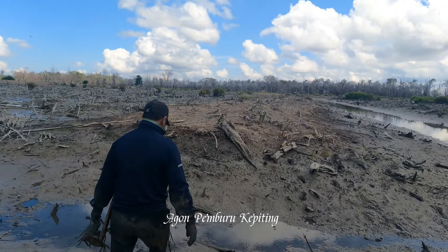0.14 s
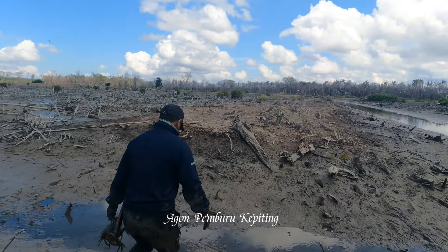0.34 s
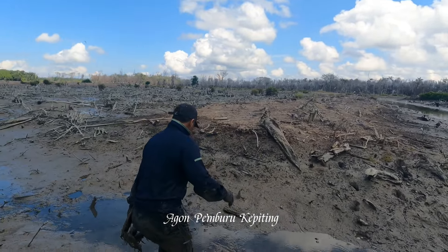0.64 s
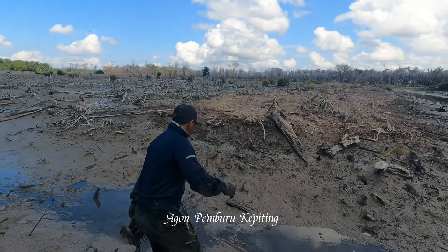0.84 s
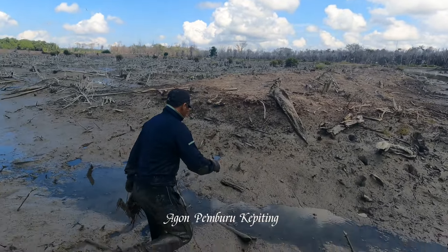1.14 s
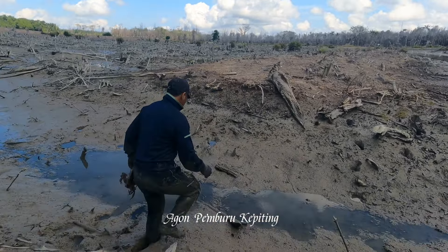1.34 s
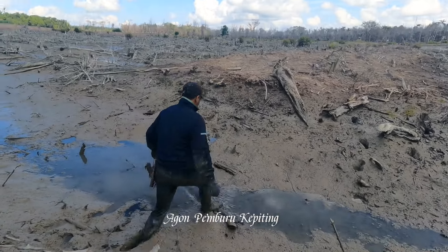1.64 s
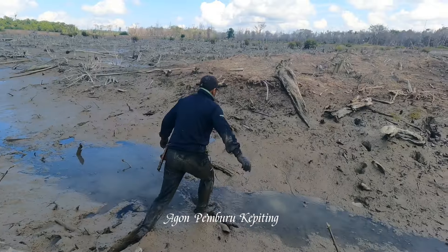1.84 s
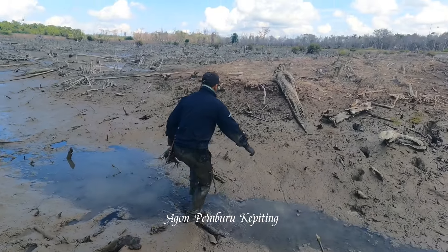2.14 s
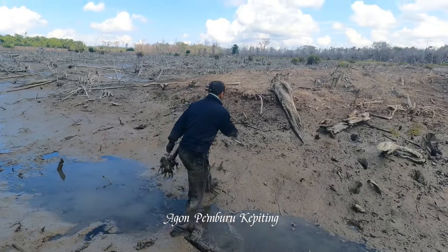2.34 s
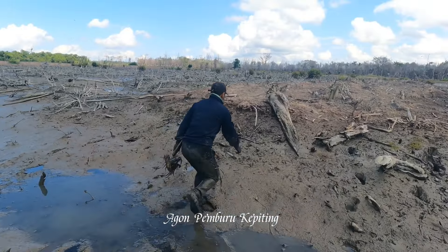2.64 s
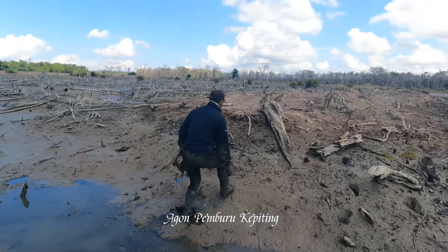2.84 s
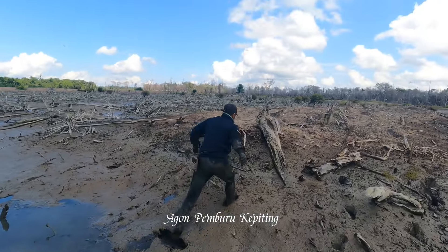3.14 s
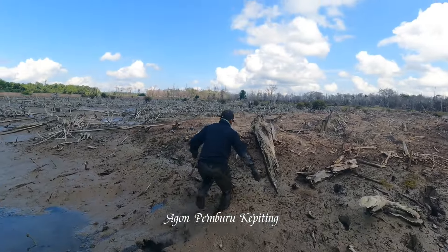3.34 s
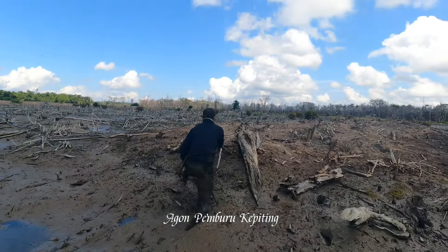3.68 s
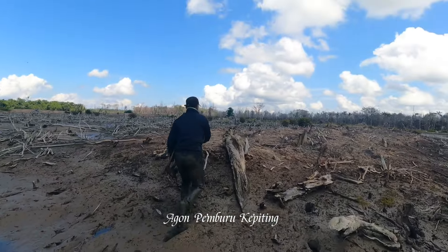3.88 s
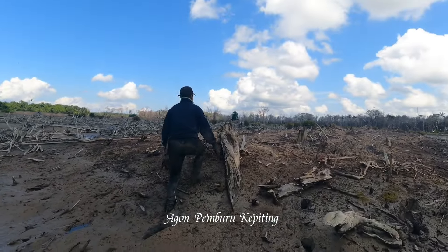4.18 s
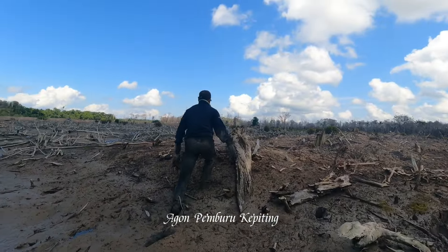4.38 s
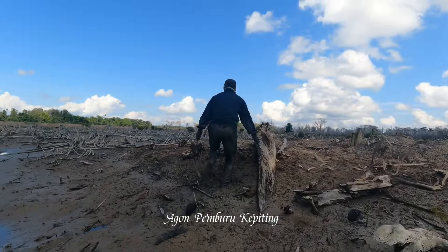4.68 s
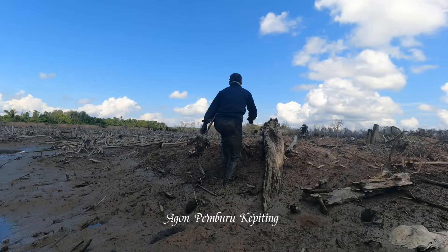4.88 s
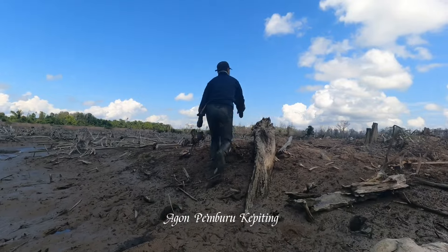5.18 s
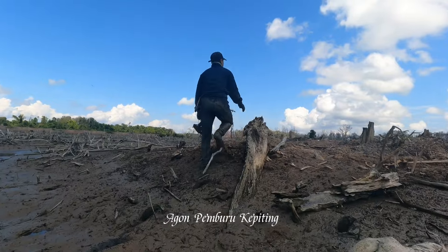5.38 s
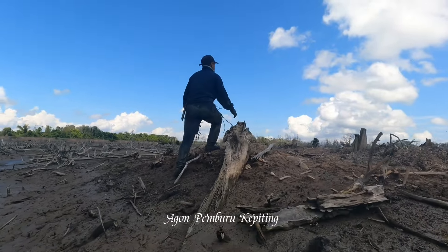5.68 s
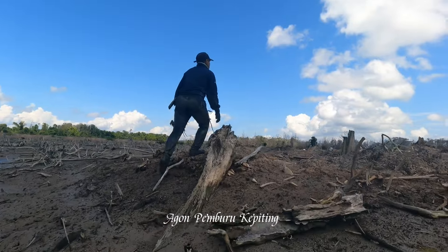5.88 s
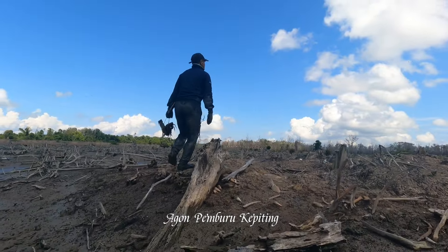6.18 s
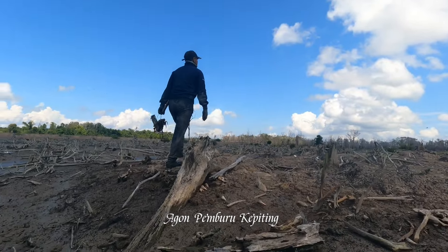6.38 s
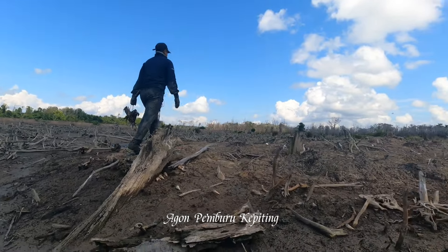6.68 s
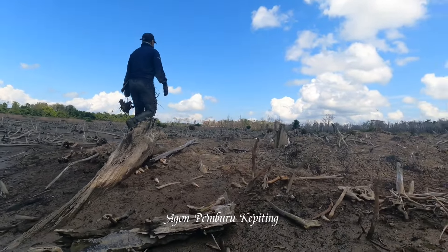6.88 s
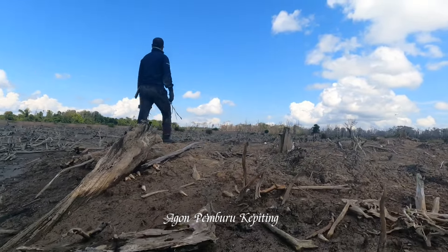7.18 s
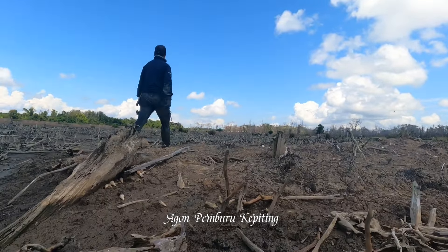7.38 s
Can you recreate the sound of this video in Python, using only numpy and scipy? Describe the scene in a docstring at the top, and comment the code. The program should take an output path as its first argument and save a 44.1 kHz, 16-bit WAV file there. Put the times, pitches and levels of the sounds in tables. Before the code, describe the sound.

Boots squelch through deep wet mud with sticky pops, gulps and bubble plinks, while low wind rumbles and dull thuds knock the microphone.

```python
"""Boots tramp through deep wet mud and up a bank of dead sticks, close to a hand-held camera.
It opens with wind rumble, dull thuds on the camera and a few pops from softly seeping mud.
Then bubbles plink, boots squelch, and from about 2 s air pockets gulp and water squirts out.
Pops and gulps grow strong from 3 to 6 s, thin out, and come back with two thuds near the end.
Mud is many tiny damped tones plus noise; pops are ringing pockets; gulps glide; wind is shaped noise."""
import sys
import numpy as np
from scipy import signal
from scipy.fft import rfft, irfft, next_fast_len
from scipy.io import wavfile
from scipy.ndimage import uniform_filter1d, map_coordinates

SR = 44100
rng = np.random.default_rng(int(sys.argv[2]) if len(sys.argv) > 2 else 0)


def waveform_to_disk(signal):
    """Save audio, clipped to [-1, 1], as 16-bit WAV at the path in sys.argv[1]."""
    frames = np.transpose(np.atleast_2d(signal))
    scaled = np.clip(frames, -1, 1) * 32767
    samples = np.round(scaled).astype(np.int16)
    wavfile.write(sys.argv[1], SR, samples)


N = 331701
TIME = np.arange(N) / SR


def amp(db):
    """Turn decibels into gain."""
    return 10 ** (np.asarray(db) / 20)


def unit(x):
    """Scale to an average strength (rms) of 1."""
    return x / np.sqrt(np.mean(x ** 2) + 1e-20)


def along(points, hz):
    """Read a table of (frequency, value) points on a log frequency axis."""
    point_hz, value = np.transpose(points)
    return np.interp(np.log(hz + 1), np.log(point_hz + 1), value)


def curves(rows):
    """Join the table rows with straight lines: one curve for each column after the time."""
    time_s, *columns = np.transpose(rows)
    return [np.interp(TIME, time_s, column) for column in columns]


def wobble(knots_per_s):
    """A smooth random curve through random knots."""
    knots = rng.standard_normal(int(N * knots_per_s / SR) + 4)
    return map_coordinates(knots, [TIME * knots_per_s])


def filtered(x, response):
    """Change the strength and phase of each frequency by a given response."""
    size = next_fast_len(N + 8192)
    hz = np.fft.rfftfreq(size, 1 / SR)
    return irfft(rfft(x, size) * response(hz), size)[..., :N]


def coloured(x, spectrum, size=8192):
    """Shape the tone with a filter of unit energy that never sounds ahead of its input."""
    level = amp(along(spectrum, np.fft.rfftfreq(size, 1 / SR)))
    cepstrum = irfft(np.log(level))
    # folding the cepstrum forward in time makes the filter causal
    fold = 1 + np.sign(size / 2 - np.arange(size))
    fold[0] = 1
    kernel = irfft(np.exp(rfft(cepstrum * fold)))
    return signal.oaconvolve(x, kernel / np.linalg.norm(kernel))[:len(x)]


def resonance(x, hz, q):
    """A damped hollow rings near one pitch; a higher q rings longer."""
    b, a = signal.iirpeak(min(hz, SR / 4), max(q, 1), SR)
    return signal.lfilter(b, a, x)


def add(track, start_s, sound):
    """Mix a sound into a track at its start time."""
    start = max(round(start_s * SR), 0)
    part = track[start:start + len(sound)]
    part += sound[:len(part)]


def steadied(x, seconds):
    """Even out slow swells, leaving an rms near 1 throughout."""
    power = uniform_filter1d(x * x, int(seconds * SR) + 1)
    return x / np.sqrt(np.abs(power) + 1e-9)


def swells(rows, attack_s, release_s):
    """Power of each level column: every event rises, holds and dies away; overlaps add."""
    power = np.zeros((len(rows[0]) - 2, N))
    t = np.arange(SR * 3 // 4) / SR
    for start_s, length_s, *levels_db in rows:
        rise = np.minimum(t / attack_s, 1)
        shape = rise * np.exp(-np.maximum(t - length_s, 0) / release_s)
        for track, level_db in zip(power, levels_db):
            add(track, start_s, (amp(level_db) * shape) ** 2)
    return power


def ringing(rows, attack_s, rough):
    """Damped gliding tones, each swelling quickly as its cavity opens."""
    track = np.zeros(N)
    t = np.arange(SR // 4) / SR
    for start_s, level_db, pitch_hz, t60_s, rise_octaves in rows:
        flex = unit(uniform_filter1d(rng.standard_normal(len(t)), size=100))  # soft walls waver
        glide = 2 ** (rise_octaves * np.minimum(t / t60_s, 1))
        pitch = pitch_hz * glide * (1 + rough * flex)
        fade = np.exp(-np.log(1000) * t / t60_s)  # 60 dB down after t60_s
        swell = 1 - np.exp(-t / attack_s)
        tone = np.sin(2 * np.pi * np.cumsum(pitch) / SR)
        add(track, start_s, amp(level_db) * fade * swell * tone)
    return track


# tone of the faint open air: frequency_hz, level_db (relative)
AIR = [(120, -20.5), (220, 1.5), (400, -10.5), (750, -14), (1250, -6), (2500, -17.5), (7000, -27),
       (10000, -31), (12300, -29), (16000, -41)]


def open_air():
    """The faint open air is steady noise with a fixed tone."""
    return amp(-46.5) * unit(coloured(rng.standard_normal(N), AIR))


# the breeze between gusts: time_s, rumble_db, flutter_db
BREEZE = [(0, -29, -39), (.45, -30, -42), (1.2, -25.5, -40.5), (1.65, -27.5, -42.5), (2.85, -23.5, -41),
          (3.3, -27.5, -44.5), (4.2, -24, -41), (4.6, -31.5, -49), (5.3, -27, -44), (6.2, -29, -46),
          (6.85, -27.5, -47.5), (7.52, -27.5, -44)]
# gusts on top of the breeze: start_s, length_s (before the fade), rumble_db, flutter_db
GUSTS = [(0, .19, -23, -25), (.77, 0.27, -22, -40), (1.47, 0.057, -13, -33), (1.73, 0.2, -21, -36),
         (1.95, 0.11, -19, -27.5), (2.22, 0.094, -17, -42), (2.43, 0.2, -19, -31),
         (2.99, 0.17, -24.5, -32.5), (3.66, 0.068, -20.5, -31), (3.87, 0.048, -26, -35),
         (4.1, 0.13, -20, -40), (5.05, 0.14, -27.5, -36), (5.84, 0.052, -29, -36), (6.65, .14, -23, -52),
         (6.98, .05, -25, -35), (7.21, .15, -20.5, -26.5)]
# tone of the deep wind rumble: frequency_hz, level_db (relative)
RUMBLE = [(8, -9.5), (20, 3), (38, 3), (60, -4.5), (95, -14), (160, -30.5), (400, -92)]
# tone of the higher wind flutter: frequency_hz, level_db (relative)
FLUTTER = [(50, -19.5), (95, 1), (175, -1.5), (250, -8.5), (400, -21), (900, -56)]


def eddies(spectrum, apart, left_db, gust_db, seconds):
    """Swirling air presses on both microphone ports together and oppositely on each one."""
    def swirl():
        return steadied(coloured(rng.standard_normal(N), spectrum), seconds)
    shared = swirl()
    own = swirl() * apart * amp(gust_db * wobble(4.6))
    return np.array([shared + own, shared - own]) * amp([[left_db / 2], [-left_db / 2]])


def wind():
    """Wind presses on the ports as rumble and flutter; the housing drones faintly."""
    breeze = amp(curves(BREEZE))
    gusts = swells(GUSTS, attack_s=0.021, release_s=0.025)
    rumble_gain, flutter_gain = np.sqrt(breeze ** 2 + gusts)
    rumble = rumble_gain * eddies(RUMBLE, apart=0.65, left_db=3.0, gust_db=-1, seconds=0.084)
    flutter = flutter_gain * eddies(FLUTTER, apart=0.69, left_db=-2.5, gust_db=6.5, seconds=0.06)
    drone = resonance(rng.standard_normal(N), hz=174.4, q=8.3)
    drone = resonance(drone, hz=174.4, q=8.3)
    return rumble + flutter + amp(-47.5) * unit(drone)


# dull thuds on the camera: start_s, level_db (before swell and left-right tilt), pitch_hz,
# t60_s (time to fade by 60 dB)
THUDS = [(.003, -5, 95, 0.069), (.152, -12.5, 105, 0.1), (0.775, -13.5, 103, 0.1), (.814, -17, 126, 0.14),
         (.98, -6.5, 69.6, 0.081), (1.028, -12.5, 106, 0.16), (1.484, 0, 93, 0.089), (1.49, -16, 165, 0.16),
         (7.241, -6.5, 128.5, 0.041), (7.295, -17, 119, 0.13)]


def thuds():
    """Knocks shake the camera body and reach both ports in phase, a little stronger on the right."""
    steady_pitch = [(*row, 0) for row in THUDS]
    return ringing(steady_pitch, attack_s=0.004, rough=0.24) * amp([[-1.5], [1.5]])


# water squirting through a closing gap: start_s, length_s, level_db (before it fades in and out),
# start_pitch_hz, end_pitch_hz
SQUIRTS = [(2.066, 0.043, -36, 733, 2590), (5.291, 0.041, -30.5, 1504, 4330),
           (5.972, 0.017, -27.5, 2110, 2750), (6.357, 0.019, -35.5, 2770, 5300)]


def squirts():
    """A sputtering whistle slides upward as the gap closes."""
    track = np.zeros(N)
    for start_s, length_s, level_db, start_hz, end_hz in SQUIRTS:
        progress = np.linspace(0, 1, int(length_s * SR))
        flicker = unit(uniform_filter1d(rng.standard_normal(SR // 4), size=50))
        sputter = 1 + 0.5 * flicker[:len(progress)]
        pitch = start_hz * (end_hz / start_hz) ** progress
        whistle = np.sin(2 * np.pi * np.cumsum(pitch) / SR)
        add(track, start_s, amp(level_db) * unit(sputter * whistle) * np.sin(np.pi * progress))
    return track


# single bubbles plinking in the wet footprints: start_s, level_db (before swell and fade), pitch_hz
BUBBLES = [(0.698, -17, 2700), (1.053, -18.5, 2900), (1.371, -17.5, 1080), (1.879, -8, 2580),
           (2.474, -11, 3000), (2.492, -12.5, 1000), (2.575, -6.5, 3080), (2.662, -13, 2950),
           (2.721, -7.5, 3960), (3.272, -13, 910), (3.553, -20.5, 900), (3.909, -9, 2920),
           (5.11, -11, 1640), (5.137, -5, 2500), (5.154, -10, 930), (5.170, -10.5, 1560),
           (5.309, -4.5, 3070), (5.619, -4.5, 4030), (6.438, -14, 3130), (6.501, -13, 2620),
           (6.721, -11, 1710), (6.821, -9, 3660), (7.324, -8, 2980)]


def bubbles(cycles=17, rise_octaves=0.088):
    """Each bubble fades by 60 dB in the same number of cycles and sharpens as it nears the surface."""
    rows = [(start_s, level_db, hz, cycles / hz, rise_octaves) for start_s, level_db, hz in BUBBLES]
    return ringing(rows, attack_s=0.00022, rough=0.005)


# big air cavities opening under a boot: start_s, level_db (before swell and fade), pitch_hz,
# t60_s (time to fade by 60 dB), rise_octaves (pitch change over that time; minus falls)
GULPS = [(1.992, -19, 299, 0.11, 0.25), (2.044, -18, 340, 0.06, -0.077), (3.853, -16, 587, 0.053, 0.031),
         (3.878, -20.5, 524, 0.05, .1), (3.903, -13.5, 328, 0.027, 0.31), (3.922, -14.5, 487, 0.059, 0.054),
         (4.555, -27, 437, 0.092, 0.15), (5.008, -25, 428, 0.074, -0.24), (5.184, -11.5, 556, 0.074, .1),
         (5.21, -5, 530, 0.044, -0.18), (5.8503, -8.5, 515, 0.02, 0.12), (5.875, -8.5, 342, 0.097, 0.073),
         (6.64, -32, 536, .06, 0.072), (7.3605, -6.5, 380, 0.038, 0.073),
         (7.452, -19.5, 900, 0.064, -0.069)]


def gulps():
    """Large air cavities ring briefly, with soft walls that make the pitch waver."""
    return ringing(GULPS, attack_s=0.00026, rough=0.11)


# trodden mud seeping between the steps: time_s, crackle_db, fizz_db
SEEPING = [(0, -53, -58), (.23, -43, -46.5), (.41, -42, -47), (.47, -53, -57), (.9, -49.5, -54),
           (1.02, -46.5, -48.5), (1.42, -43, -48.5), (1.56, -53, -59), (2.2, -45.5, -49.5),
           (2.38, -60, -61), (2.55, -41, -47), (3.05, -42.5, -50), (3.65, -44, -47), (4.45, -41, -44),
           (4.86, -45.5, -45.5), (5.2, -39.5, -47), (5.7, -48, -51.5), (7.52, -44, -46.5)]
# a boot presses into the mud or pulls free: start_s, length_s (before the fade),
# gurgle_db, squelch_db, spray_db
SQUELCHES = [(.135, 0.066, -32.5, -38.5, -42), (.59, 0.074, -47, -43, -45),
             (.675, 0.036, -44.5, -36.5, -45), (.955, 0.054, -42.5, -40, -51),
             (1.35, 0.025, -33.5, -35.5, -45), (1.71, .045, -41, -38, -43), (1.79, 0.11, -50, -44, -50),
             (1.865, 0.095, -45, -31.5, -46.5), (1.965, 0.085, -37.5, -33, -40),
             (2.44, .03, -38.5, -29.5, -42), (2.467, 0.042, -34, -26.5, -34.5),
             (2.54, 0.055, -40.5, -35.5, -47.5), (2.715, .025, -32, -37, -43), (2.76, .04, -46, -35, -53.5),
             (2.85, 0.021, -37, -41.5, -53), (3.02, 0.17, -45, -39, -55), (3.225, 0.047, -37, -28, -39),
             (3.38, 0.059, -42.5, -34.5, -44), (3.665, 0.025, -40, -29, -40), (3.866, .03, -32, -35, -35),
             (3.9, 0.027, -28.5, -23.5, -36.5), (3.95, 0.073, -44.5, -32.5, -43),
             (4.06, 0.076, -49.5, -41.5, -44.5), (4.145, 0.014, -40, -36, -33),
             (4.37, .14, -36.5, -31, -36.5), (4.53, 0.1, -44, -42, -40.5), (4.915, 0.038, -62, -33, -39),
             (5.025, 0.1, -36, -36.5, -58), (5.135, 0.065, -32.5, -27.5, -40), (5.235, .05, -42, -39, -43),
             (5.295, .02, -46, -36, -37), (5.57, 0.033, -49, -30.5, -40), (5.725, 0.021, -39, -41, -64),
             (5.81, .08, -33, -37, -48), (5.96, 0.013, -52, -33.5, -60), (6.345, .1, -69, -40.5, -42),
             (6.615, 0.069, -39, -47, -48), (6.7, .05, -39, -35, -42), (6.76, .07, -35, -30, -39),
             (6.86, 0.05, -40.5, -41, -65), (6.96, 0.074, -42.5, -45, -43.5),
             (7.275, 0.12, -34.5, -29, -36.5), (7.44, 0.13, -43, -33, -41)]


def mud_motion():
    """Gains of gurgle, crackle and spray: each squelch stands out of the steady seeping."""
    crackle_db, fizz_db = curves(SEEPING)
    gurgle_db = crackle_db - 6
    seep = amp([gurgle_db, crackle_db, fizz_db])
    # the mud yields quickly and relaxes more slowly
    steps = swells(SQUELCHES, attack_s=0.0066, release_s=0.024)
    return np.sqrt(seep ** 2 + steps)


def cells(per_s, low_hz, high_hz, cycles, spread_db, rise, size=400):
    """Tiny bursting mud cells: short damped tones of random size that rise in pitch."""
    chances = rng.random((int(per_s * N / SR), 4))
    when, pitch, life, strength = chances.T[..., None]
    k = np.arange(size)
    turns = low_hz * (high_hz / low_hz) ** pitch * k / SR
    age = turns / (cycles * (0.5 + life))  # reaches 1 when the tone is 60 dB down
    phase = 2 * np.pi * turns * (1 + rise * np.minimum(age, 1))
    tones = np.sin(phase) * np.exp(-np.log(1000) * age)
    gain = amp(spread_db * np.minimum(-np.log(1 - strength), 4))  # a few cells are much louder
    places = (when * N).astype(int) + k
    return unit(np.bincount(places.ravel(), (gain * tones).ravel())[:N])


# tone of the big gurgling cells: frequency_hz, level_db (relative)
GURGLE = [(150, -25), (300, -5), (480, -5.5), (800, -1), (1100, -2.5), (2000, -62)]
# tone of the small crackling cells: frequency_hz, level_db (relative)
SQUELCH = [(450, -20), (800, -14.5), (1100, -0.5), (1900, -0.5), (2600, 4), (3600, 3.5), (4600, -0.5),
           (7000, -62)]
# tone of the fizzing wet film and the droplets of the pops: frequency_hz, level_db (relative)
SPRAY = [(2200, -26), (3800, -3.5), (4700, -0.5), (6000, 2), (7100, 3.5), (8200, -4.5), (10500, -10),
         (12200, -8), (15500, -20.5)]


def squelching(gurgle_gain, crackle_gain, spray_gain):
    """Under the boot, big cells gurgle, small ones crackle and plink, and the wet film fizzes."""
    def layer(grains, spectrum, smear):
        noisy = grains + smear * rng.standard_normal(N)
        return steadied(coloured(noisy, spectrum), 0.055)
    big = cells(420, 267.6, 1077, cycles=11.3, spread_db=3.5, rise=0.16, size=1600)
    plinks = 0.5 * cells(170, 950, 4300, cycles=20, spread_db=5.5, rise=0.14, size=1200)
    crackle = cells(1300, 840, 4300, cycles=4.6, spread_db=1.0, rise=0.15, size=500)
    film = cells(1300, 3540, 16400, cycles=29, spread_db=3.5, rise=0.089, size=260)
    gurgle = layer(big, GURGLE, smear=0.68)
    squelch = layer(crackle + plinks, SQUELCH, smear=0.45)
    spray = layer(film, SPRAY, smear=1.0)
    tearing = amp(1.5 * wobble(110))  # the mud sticks and gives way in fits
    return tearing * (gurgle_gain * gurgle + crackle_gain * squelch + spray_gain * spray)


def hollows(x, depth_db):
    """Small hollows open and close in the mud, each favouring its own pitch for a moment."""
    spectrogram = signal.stft(x, nperseg=256)[2]
    field = rng.standard_normal(spectrogram.shape)
    field = uniform_filter1d(field, size=4, axis=0)  # smooth over pitch
    field = uniform_filter1d(field, size=6, axis=1)  # smooth over time
    gain = unit(amp(depth_db * unit(field)))
    return signal.istft(spectrogram * gain, nperseg=256)[1][:N]


POCKETS_PER_S = 9
# levels relative to the crackle around them, and their random scatter either way
POCKET_DB, POCKET_SPRAY_DB, POCKET_SPREAD_DB = 2, -4, 2
# typical pitch, its scatter either way, and typical tear setting
POCKET_HZ, POCKET_SPREAD_OCTAVES, POCKET_TEAR_S = 2200, 0.75, 0.0012


def small_pockets(crackle_gain):
    """Small pockets burst at random, louder where the mud is worked; rows like those of POPS."""
    rows = []
    for when, *chance in rng.random((int(POCKETS_PER_S * N / SR), 5)):
        size, pitch, tear, wet = 2 * np.array(chance) - 1
        level_db = 20 * np.log10(crackle_gain[int(when * N)]) + POCKET_SPREAD_DB * size
        body_db = level_db + POCKET_DB
        pitch_hz = POCKET_HZ * 2 ** (POCKET_SPREAD_OCTAVES * pitch)
        tear_s = POCKET_TEAR_S * 2 ** tear
        spray_db = level_db + POCKET_SPRAY_DB + POCKET_SPREAD_DB * wet
        rows.append((when * N / SR, body_db, pitch_hz, tear_s, spray_db))
    return rows


def over_10_ms(x):
    """Give a short sound the energy of 10 ms at rms 1."""
    return x / np.linalg.norm(x) * np.sqrt(SR / 100)


# popping mud pockets and snapping sticks: start_s, body_db (over 10 ms), pitch_hz,
# tear_s (sets how long and how strongly it tears), spray_db (over 10 ms)
POPS = [(.0811, -27.5, 3460, .0018, -31.5), (.15, -21.5, 3000, 0.0014, -24),
        (.195, -31, 2200, 0.0032, -29.5), (.2695, -38, 840, .0023, -58), (.396, -31, 2200, 0.00036, -50),
        (.591, -46, 4600, 0.0018, -27.5), (.658, -48, 1870, .0005, -36.5), (.9164, -49, 3500, .0005, -46),
        (1.2237, -43, 1800, .0035, -39), (1.3144, -32, 1080, .0016, -44), (1.583, -35, 2990, 0.0021, -38),
        (1.7346, -29.5, 1160, 0.0025, -40), (1.937, -24, 2500, .0023, -49), (1.946, -27, 2180, .011, -39),
        (1.986, -26.5, 1280, 0.00087, -41), (2.0115, -32, 2390, 0.0033, -37),
        (2.0231, -28, 1160, .0019, -50), (2.0429, -29, 1510, 0.0037, -38), (2.203, -40, 2200, .004, -45),
        (2.304, -39, 800, .002, -50), (2.444, -30, 1220, 0.0027, -47), (2.4718, -25, 1440, 0.0061, -48),
        (2.7187, -31, 3800, .0016, -45), (2.729, -29.5, 855, 0.0019, -49),
        (3.1258, -22, 2660, 0.0042, -33.5), (3.2466, -20, 2380, 0.0036, -36),
        (3.271, -23, 1790, 0.0035, -48), (3.3851, -19.5, 1900, .004, -31.5),
        (3.6655, -18, 1820, .0048, -24.5), (3.8526, -20.5, 1020, 0.0014, -31),
        (3.9607, -28, 1850, .001, -38), (3.9646, -20, 3300, 0.00035, -25.5),
        (4.0155, -25.5, 2380, 0.0036, -56), (4.0617, -31.5, 2850, 0.0018, -37.5),
        (4.1467, -23, 3100, 0.00054, -33.5), (4.1683, -29.5, 1470, 0.0013, -40),
        (4.2482, -34, 2200, .0011, -35), (4.2787, -29.5, 1260, 0.0017, -35),
        (4.3256, -23, 1750, 0.00089, -35.5), (4.3735, -24.5, 3400, .0018, -51),
        (4.47, -20.5, 2000, 0.0012, -49), (4.5019, -20, 2300, 0.00046, -28),
        (4.6139, -26.5, 2770, 0.0014, -26), (4.6537, -48, 3450, .0005, -36.5),
        (4.6897, -37, 2830, .0006, -31), (4.786, -22.5, 3200, 0.0024, -23.5),
        (4.901, -29.5, 2710, 0.0017, -31.5), (4.9293, -22.5, 1250, 0.0016, -41),
        (4.9414, -22, 1570, 0.00028, -56), (4.9734, -35, 1470, .0035, -40),
        (5.1097, -18, 1550, 0.0031, -44), (5.1366, -17.5, 2480, 0.0021, -31),
        (5.1464, -28, 1120, 0.0046, -41), (5.4019, -19.5, 1520, 0.0013, -33),
        (5.568, -16.5, 1850, 0.0019, -23), (5.5778, -23, 2360, .0005, -35), (5.718, -16, 1350, 0.0013, -35),
        (5.751, -34, 2560, .0023, -45), (5.8502, -21.5, 666, 0.0033, -56),
        (5.873, -25.5, 1130, 0.0043, -45), (6.4015, -19.5, 1190, 0.0012, -36.5),
        (6.6197, -30, 780, 0.0046, -34.5), (6.72, -35, 1700, .0042, -41), (6.863, -29, 920, 0.001, -55),
        (7.0272, -30.5, 1650, 0.004, -34), (7.0602, -28.5, 1490, 0.0031, -30.5),
        (7.1557, -13, 1260, 0.0035, -27.5), (7.2685, -27, 1600, 0.005, -31.5),
        (7.3549, -15, 3100, 0.0021, -36), (7.4, -19, 2840, 0.0012, -44), (7.4095, -16, 2840, 0.0027, -57)]


def pops(rows, q=2.5, ring_q=12, ring=0.25, slap=0.44, clean_s=0.00086, clutter_db=-19, size=3000):
    """A skin breaks, tears on for a moment and rings the pocket behind it; droplets spray."""
    body, spray = np.zeros(N), np.zeros(N)
    t = np.arange(size) / SR
    pocket_tone = [(200, -14.5), (600, -2.5), (1100, 1.5), (3600, -1), (5500, -10.5), (9000, -50)]
    for start_s, body_db, hz, tear_s, spray_db in rows:
        # noise with uneven, gritty strength
        grit = rng.standard_normal((2, size)) * amp(4.8 * rng.standard_normal((2, size)))
        torn = t / (1.9 * abs(tear_s) + 1e-4)
        tear = grit[0] * np.sqrt(torn) * np.exp(-torn ** 2)  # gathers speed, then runs out
        scatter = grit[1] * np.exp(-t / 0.018)  # rough ground close by throws some back
        force = over_10_ms(t == 0)  # the skin breaks in one click
        force = force + tear_s / clean_s * over_10_ms(tear)
        force = force + amp(clutter_db) * over_10_ms(scatter)
        pocket = resonance(force, hz, q) + ring * resonance(force, hz * 1.83, ring_q)
        # long tears open a deeper cavity
        pocket += slap * min(tear_s / 0.006, 1) * resonance(force, hz * 0.47, q)
        pocket = coloured(pocket, pocket_tone, size=512)
        droplets = coloured(force, SPRAY, size=512)
        add(body, start_s, amp(body_db) * over_10_ms(pocket))
        add(spray, start_s, amp(spray_db) * over_10_ms(droplets))
    return body + spray


# loudness of left over right port: frequency_hz, difference_db
BALANCE = [(250, -4.5), (780, -4), (1000, 0), (1600, 2), (3100, 5.5), (4500, 13.5), (7000, 20), (15000, 35)]
# how far the left port leads (minus means it lags): frequency_hz, phase_radians
LEAD = [(60, -0.43), (260, -1.44), (500, -1.5), (4000, -1.45)]
# how alike the two ports sound: frequency_hz, likeness (0 to 1, no unit)
ALIKE = [(400, .99), (1200, .98), (3000, .955), (4200, .8), (5500, .35), (12000, .25)]


def ports(x):
    """The two ports hear the ground out of phase; the right one is muffled and its treble diffuse."""
    def pair(hz):
        left = amp(along(BALANCE, hz)) * np.exp(1j * along(LEAD, hz))
        return np.array([left, np.ones_like(left)]) * 2 / (1 + left)  # the two average to 1

    def direct(hz):
        return pair(hz)[1] * np.clip(along(ALIKE, hz), 0, 1)

    def indirect(hz):
        alike = np.clip(along(ALIKE, hz), 0, 1)
        return pair(hz)[1] * np.sqrt(1 - alike ** 2)
    # many random paths, fading out over 40 ms
    paths = rng.standard_normal(SR // 25) * np.linspace(1, 0, SR // 25) ** 2
    diffuse = signal.oaconvolve(x, paths / np.linalg.norm(paths))[:N]
    left = filtered(x, lambda hz: pair(hz)[0])
    right = filtered(x, direct) + filtered(diffuse, indirect)
    return np.array([left, right])


def scene():
    """Mud and sticks ahead, faint open air around, wind and thuds on the camera."""
    gurgle_gain, crackle_gain, spray_gain = mud_motion()
    mud = hollows(squelching(gurgle_gain, crackle_gain, spray_gain), depth_db=3.2)
    bursts = pops([*POPS, *small_pockets(crackle_gain)])
    steps = mud + bursts + bubbles() + gulps() + squirts()
    return ports(steps + open_air()) + wind() + thuds()


def record(dry):
    """The camera clips at full scale, then keeps only what lies below 16 kHz."""
    clipped = np.clip(dry, -1, 1)
    return filtered(clipped, lambda hz: hz < 16000)


dry = scene()
out = record(dry)
waveform_to_disk(out)
```